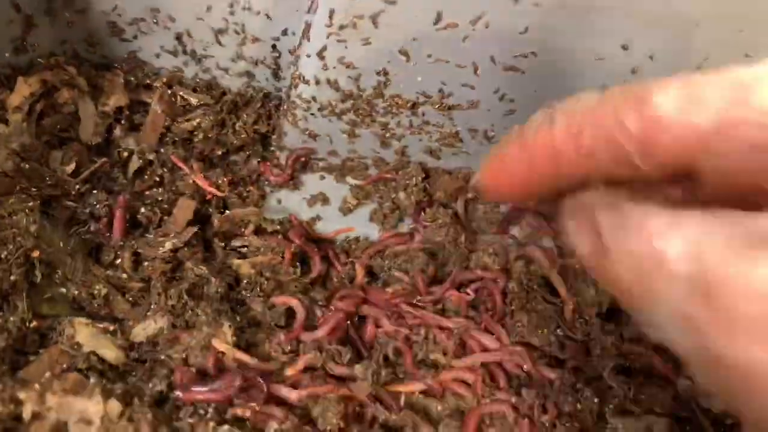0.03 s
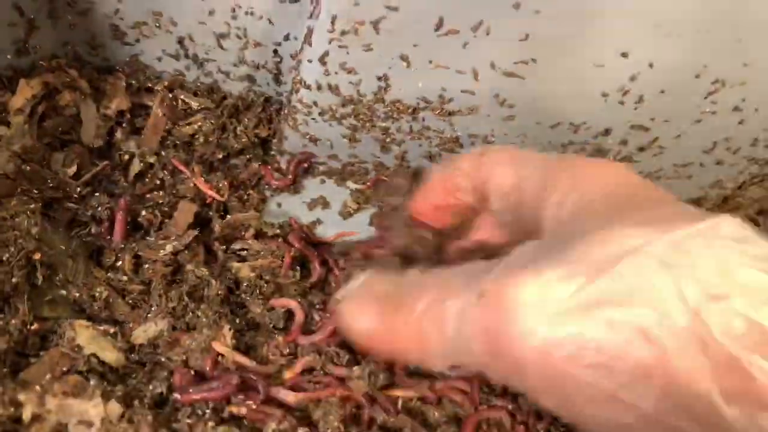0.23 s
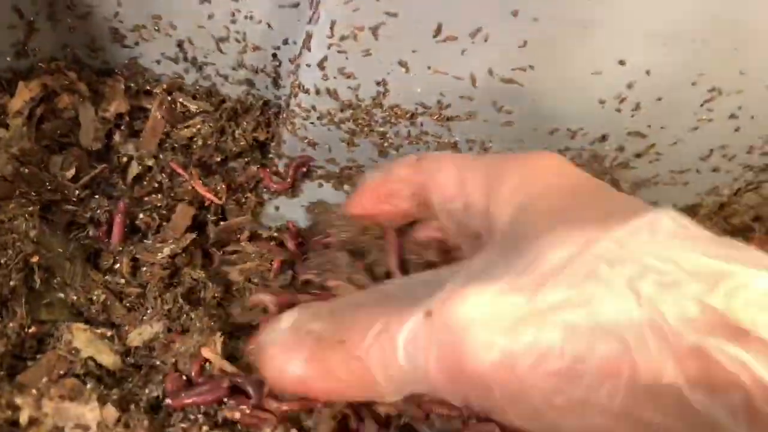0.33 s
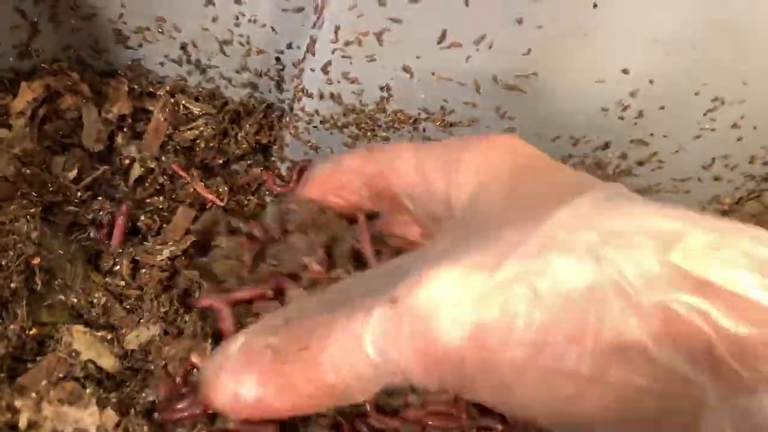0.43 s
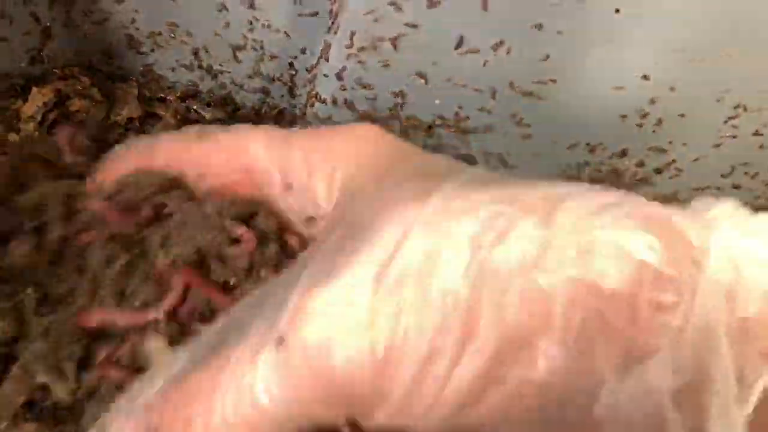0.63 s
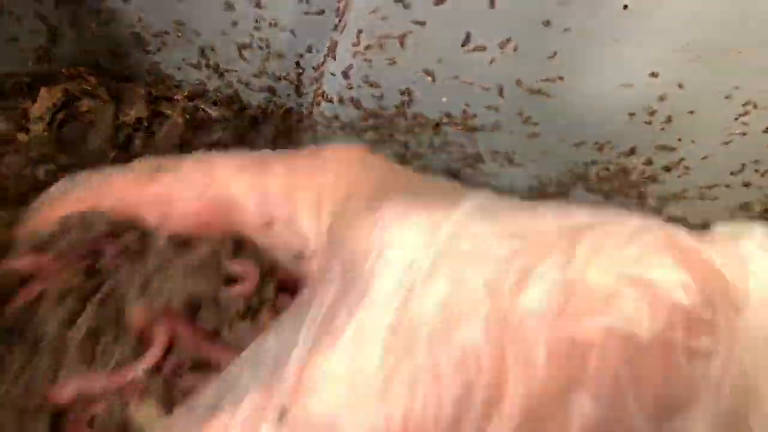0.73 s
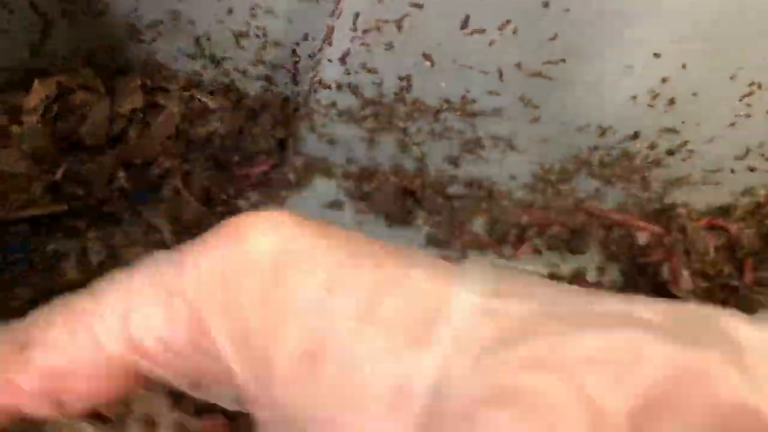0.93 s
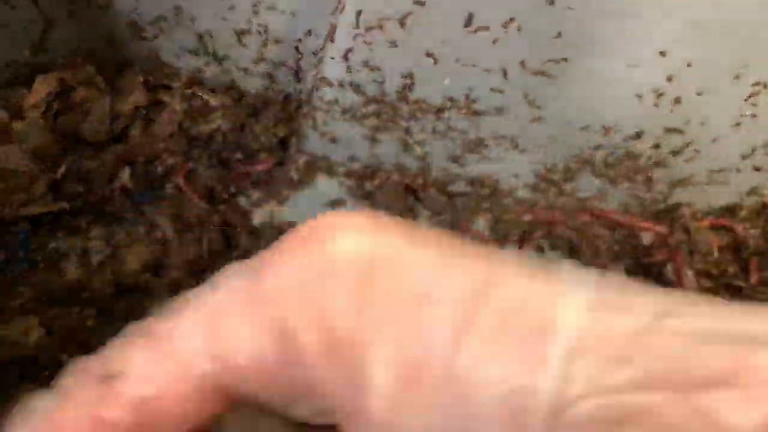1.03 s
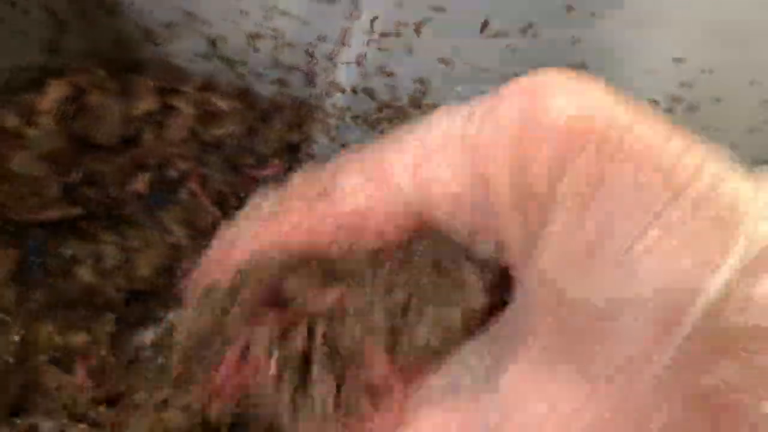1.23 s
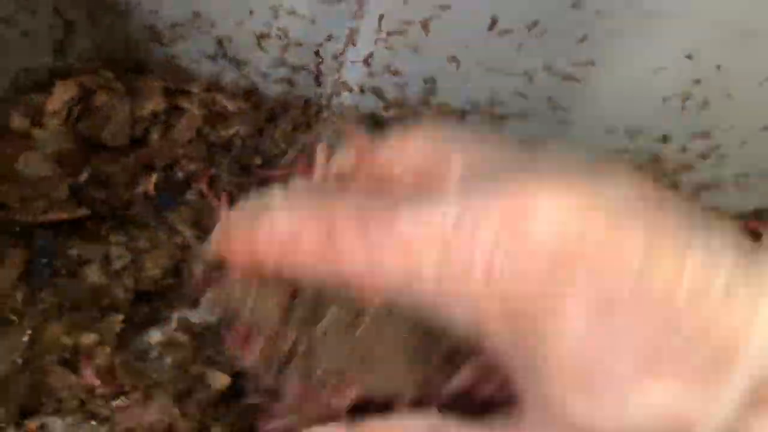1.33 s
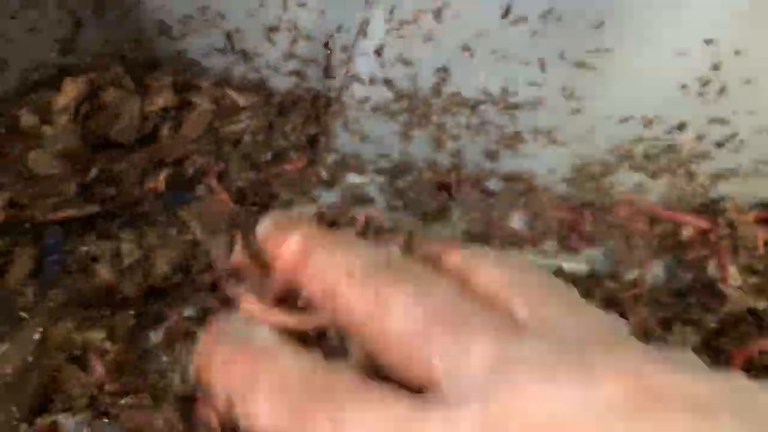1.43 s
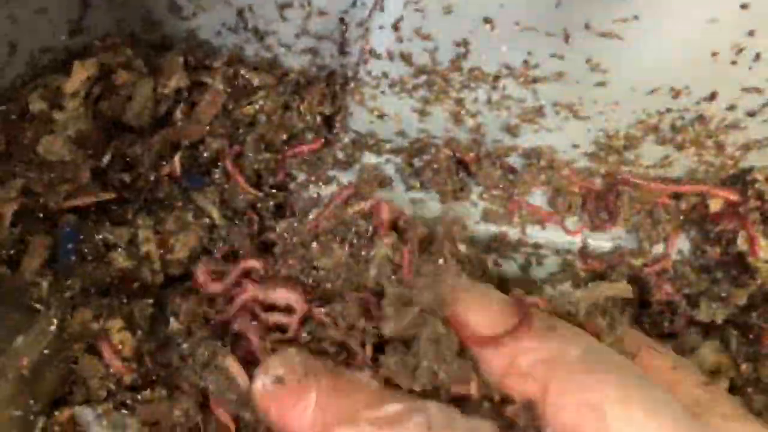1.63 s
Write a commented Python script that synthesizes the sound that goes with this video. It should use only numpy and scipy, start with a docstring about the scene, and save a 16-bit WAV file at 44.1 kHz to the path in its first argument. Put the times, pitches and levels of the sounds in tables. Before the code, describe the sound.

Damp bedding rustles and crackles as fingers scoop it, bumping a plastic bin close by.

```python
"""Faint wet ticks come first, then a knock: a bare hand scoops moist worm bedding in a plastic bin.
Close by, the fingers plough through crackling crumbs, rub the bin floor, then dig a second time.
Knocks and rubbing make the bin ring; wet crumbs snap in between, and a bubble bursts near the end.
Behind it all, faint low tones swell and fade over a quiet room rumble and hiss."""
import sys
import numpy as np
from scipy import signal
from scipy.fft import rfft, irfft
from scipy.io import wavfile

SR = 44100
rng = np.random.default_rng(int(sys.argv[2]) if len(sys.argv) > 2 else 0)


def master_out(mix):
    """Clip the mix to full scale and print it as 16-bit PCM to the path in sys.argv[1]."""
    frames = np.transpose(np.atleast_2d(mix))
    ceiling = np.clip(frames, -1, 1)
    pcm = np.round(ceiling * 32767).astype(np.int16)
    wavfile.write(sys.argv[1], SR, pcm)


N = 74970

# tone of the room's rumble and of its hiss (frequency [Hz], gain [dB])
RUMBLE_COLOUR = [(15, 7), (25, -18), (65, 5), (130, 0.5), (184, -2.5), (226, -7.5), (267, -6), (334, -16.5),
                 (501, -15), (700, -27.5), (910, -114), (1540, -120)]
HISS_COLOUR = [(300, -18), (700, -39), (1500, 3.5), (3000, 4.5), (4800, 6), (5700, 11), (6800, 4),
               (9500, 3), (14000, -43)]
# how the rumble rises and falls (time [s], gain [dB])
RUMBLE_SWELL = [(0, -7.5), (.17, -4.5), (.27, 3.5), (.45, -4), (.7, 3), (1.15, -0.5), (1.4, -2.5),
                (1.7, -3.5)]
# low tones (pitch [Hz], start [s], loudest moment [s], end [s], peak level [dB])
LOW_TONES = [(73, 0.71, 0.9, 1.015, -42), (255, 1.004, 1.111, 1.216, -51), (252, 0.595, 0.61, 1.3, -59)]
# ringing of the bursting bubble (pitch [Hz], level [dB], time to fade by 60 dB [s])
BUBBLE_RING = [(1990, -47, 0.025), (3070, -41, 0.018), (4680, -41.5, 0.014), (5170, -36.5, .012),
               (5750, -43, 0.019), (7130, -48, 0.04)]
# wet crumbs snapping (time [s], peak level [dB], centre [Hz], width [Hz], fade time [s])
WET_TICKS = [(0.033, -54.5, 670, 690, 0.0019), (0.0439, -44.5, 5950, 12000, 0.0019),
             (0.0426, -55, 4830, 1300, 0.0021), (0.131, -52, 8500, 4000, 0.0013),
             (0.198, -29.5, 1020, 835, 0.0052), (0.198, -38, 9100, 18000, 0.0016),
             (0.221, -39.5, 1160, 595, 0.0028), (0.219, -40.5, 9000, 12100, 0.007),
             (0.621, -36, 740, 600, 0.0021), (0.653, -46, 920, 800, 0.0031),
             (0.662, -43, 6000, 9000, 0.0046), (0.833, -49, 8200, 2500, 0.007),
             (1.0105, -42, 5500, 12100, 0.0057), (1.012, -54, 645, 600, 0.0018),
             (1.011, -51, 3200, 1400, 0.0023), (1.025, -53.5, 3400, 800, 0.0036),
             (1.206, -54, 1800, 450, 0.0026), (1.309, -39.5, 10900, 14000, 0.00068),
             (1.338, -45.5, 6100, 5000, 0.0017), (1.364, -43.5, 970, 710, 0.0016),
             (1.387, -48, 4100, 1800, 0.0028), (1.401, -49, 1110, 450, 0.0017),
             (1.46, -41.5, 8400, 7000, 0.002), (1.47, -48.5, 1050, 714, 0.0026),
             (1.504, -46, 2540, 900, 0.0022), (1.613, -37.5, 11500, 13800, 0.00094)]
# ringing of the filled bin (pitch [Hz], relative level [dB], time to fade by 60 dB [s])
BIN_RING = [(67, -54, 0.037), (157.6, 6, 0.084), (366, -3.5, 0.16), (394, 4, 0.042), (471.6, -0.5, 0.059),
            (577, -7, 0.024), (734, -7.5, 0.046), (930, -12, 0.043), (1057, -12.5, 0.076),
            (1210, -12.5, 0.13), (1680, -5.5, 0.023)]
# fingers knocking the bin (time [s], peak level [dB], softness of the touch [ms])
KNOCKS = [(0.0324, -53, 0.66), (0.137, -51.5, 0.61), (0.1995, -28, 0.44), (0.204, -21.5, 0.54),
          (0.209, -29.5, 2.6), (0.218, -30, 7.5), (0.2277, -34.5, 0.13), (0.373, -46, 3.7),
          (0.584, -41, 0.66), (.615, -39.5, 1.4), (.638, -37, 2.7), (0.6207, -31.5, 0.41),
          (0.669, -45.5, 5.9), (.943, -36.5, 1.13), (0.955, -40.5, 0.93), (1.275, -48.5, 0.29),
          (1.339, -42.5, 6.3), (1.41, -37, 3.9), (1.422, -35, 2.4), (1.478, -41.5, 0.68)]
# fingers rubbing the bin floor (start [s], rise [s], fall [s], level [dB], softness of the touch [ms])
RUBS = [(0.45, 0.035, 0.043, -58, 4), (0.575, 0.064, 0.068, -39.5, 0.35), (0.911, 0.015, 0.07, -56, 1),
        (1.343, 0.084, 0.042, -60, 1.2)]
# tone of the rubbing (frequency [Hz], gain [dB])
RUB_COLOUR = [(60, -17), (150, 13), (250, 2), (400, 4), (600, 13), (800, 8.5), (1100, -3), (2000, -2.5)]
# tone of the crackle (frequency [Hz], gain [dB])
CRACKLE_COLOUR = [(120, -33), (220, -8), (400, -5.5), (700, -1.5), (1100, -1), (1500, -7), (2500, -6),
                  (3500, -7), (4800, -8), (6400, -3), (7300, -7.5), (8400, -5), (10000, -5.5),
                  (11500, -29.5), (12400, -6), (13500, -7), (15000, -17)]
# how hard the hand stirs the crumbs (time [s], gain [dB])
STIRRING = [(0, -74.5), (.14, -75), (.188, -62.5), (.204, -53), (.225, -50.5), (.25, -57), (.335, -53),
            (.385, -54.5), (.47, -57), (.53, -54.5), (.6, -55), (.665, -52.5), (.705, -61.5), (.77, -68),
            (.83, -63), (.96, -68), (1.06, -68.5), (1.15, -79), (1.3, -77), (1.34, -59), (1.41, -62.5),
            (1.46, -57.5), (1.51, -66), (1.6, -66), (1.7, -69.5)]
# how much louder the digging is on the left (frequency [Hz], left minus right [dB])
LEFT_LEAN = [(100, 0.5), (280, 1.5), (500, 1), (1000, 4.5), (2000, 4.5), (4500, 0)]

HAND_LAG_MS, BIN_LAG_MS = 0.2212, 0.12  # both sounds reach the right side first
CRUMBS_PER_S, CRUMB_DB = 6500, 4.5
CLUMPS_PER_S, CLUMP_DB = 150, 1  # crumbs give way in clumps, so their level flickers
SIZZLE_DB, GRIT_DB = -9, -13  # relative to the direct crackle and to the rub

TIME = np.arange(N) / SR  # seconds at each sample
FREQS = np.maximum(np.arange(N // 2 + 1) * SR / N, 1)  # Hz at each point of a spectrum


def undb(db):
    """Turn decibels into a gain to multiply by."""
    return 10 ** (np.asarray(db) / 20)


def unit(x):
    """Scale a sound to an average (rms) level of 1."""
    return x / np.sqrt(np.mean(x ** 2) + 1e-20)


def curve(rows):
    """Gain over time from (time [s], gain [dB]) points."""
    return undb(np.interp(TIME, *np.array(rows).T))


def across(rows):
    """Join (frequency [Hz], value) points into a line over the whole spectrum."""
    hz, value = np.array(rows).T
    return np.interp(np.log(FREQS), np.log(hz), value)


def filtered(x, gain):
    """Give each frequency of a sound its own gain."""
    return irfft(rfft(x) * gain, N)


def colour(x, rows):
    """Shape the tone with (frequency [Hz], gain [dB]) points."""
    return filtered(x, undb(across(rows)))


def resonate(x, hz, width_hz):
    """Keep a band around one frequency and weaken the rest."""
    return filtered(x, 1 / (1 + 1j * (FREQS / hz - hz / FREQS) * hz / width_hz) ** 2)


def soften(x, softness_ms):
    """A fleshy fingertip spreads its push over time, which dulls the treble."""
    return filtered(x, 1 / (1 + 2j * FREQS * softness_ms / 1000) ** 2)


def stereo(x, lag_ms):
    """The same sound on both sides, a little later on the left."""
    return np.array([filtered(x, np.exp(-2j * np.pi * FREQS * lag_ms / 1000)), x])


def since(start):
    """Seconds since a moment, zero before it."""
    return np.maximum(TIME - start, 0)


def wander(per_s):
    """Glide between random values, mostly between -1 and 1."""
    return np.interp(TIME * per_s, np.arange(1000), rng.standard_normal(1000))


def clicks(per_s, spread_db):
    """Random clicks, most small and a few large."""
    happens = rng.random(N) < per_s / SR
    size = undb(spread_db * np.minimum(rng.exponential(size=N), 6))
    return happens * size * rng.choice([-1, 1], N)


def ring(tones, start=0, fade_scale=1):
    """A struck object rings with several pure tones that die away."""
    t = since(start)
    return sum(undb(db) * np.sin(2 * np.pi * hz * t) * undb(-60 * t / (fade_s * fade_scale))
               for hz, db, fade_s in tones)


def room(rumble_db=-52, hiss_db=-68.5):
    """A rumble, nearly alike in both ears, and a wide, faint hiss."""
    rumble = colour(rng.standard_normal(N) + 0.21 * rng.standard_normal((2, N)), RUMBLE_COLOUR)
    rumble = filtered(rumble, 1 / (1 + (FREQS / 600) ** 4))  # fades out above 600 Hz
    hiss = colour(0.42 * rng.standard_normal(N) + rng.standard_normal((2, N)), HISS_COLOUR)
    return unit(rumble) * undb(rumble_db) * curve(RUMBLE_SWELL) + unit(hiss) * undb(hiss_db)


def low_tones():
    """Soft low tones swell, waver a little in pitch and fade."""
    out = np.zeros(N)
    for hz, start, top, end, db in LOW_TONES:
        pitch = hz * (1 + 0.008 * wander(per_s=20))
        swell = np.interp(TIME, [start, top, end], [0, 1, 0])
        out += undb(db) * swell * np.sin(2 * np.pi * np.cumsum(pitch) / SR)
    return out


def bubble(start=1.6661, rise_s=0.0008):
    """One small bubble bursts and rings briefly."""
    return ring(BUBBLE_RING, start) * (1 - np.exp(-since(start) / rise_s))


def wet_ticks():
    """Wet crumbs snap one by one, each a tiny burst of noise."""
    out = np.zeros(N)
    for start, db, hz, width_hz, fade_s in WET_TICKS:
        t = since(start)
        burst = rng.standard_normal(N) * (t > 0) * np.exp(-t / fade_s)
        tick = resonate(burst, hz, width_hz)
        out += undb(db) * tick / np.abs(tick).max()
    return out


def finger_knocks(bass_cut_hz=30):
    """Each knock sets the plastic bin ringing; a softer touch sounds duller."""
    out = np.zeros(N)
    for start, db, softness_ms in KNOCKS:
        knock = soften(ring(BIN_RING, start), softness_ms)
        knock = filtered(knock, 1 / (1 + bass_cut_hz / (1j * FREQS)))  # the bin gives off little deep bass
        out += undb(db) * knock / np.abs(knock).max()
    return out


def finger_rubs():
    """Fingers stick and slip on the bin floor, making it ring and dragging grit along."""
    out = np.zeros(N)
    damped_bin = ring(BIN_RING, fade_scale=0.58)
    for start, rise, fall, db, softness_ms in RUBS:
        slips = np.diff(clicks(per_s=1300, spread_db=1.5), prepend=0)
        ringing = signal.fftconvolve(slips, damped_bin)[:N]
        rub = unit(colour(soften(ringing, softness_ms), RUB_COLOUR))
        grit = unit(resonate(clicks(CRUMBS_PER_S, spread_db=1.5), hz=3230, width_hz=2400))
        stroke = np.interp(TIME, [start, start + rise, start + rise + fall], [0, 1, 0])
        out += undb(db) * (rub + undb(GRIT_DB) * grit) * stroke
    return out


def wall_echoes(x, count=32, fade_s=0.0037, changes_per_s=17, gain_db=3):
    """Quick echoes off the bin walls differ left and right, and change as the hand moves."""
    echoes = rng.standard_normal((count, 2, SR // 50)) * np.exp(-TIME[:SR // 50] / fade_s)
    echoes /= np.sqrt(np.sum(echoes ** 2, axis=-1, keepdims=True))
    hand_place = np.minimum(TIME * changes_per_s, count - 1)
    out = np.zeros((2, N))
    for place, echo in enumerate(echoes):
        blend = np.sqrt(np.maximum(1 - np.abs(hand_place - place), 0))
        out += blend * signal.oaconvolve(x[None], echo, axes=1)[:, :N]
    return undb(gain_db) * out


def crumbs():
    """Stirred crumbs make a dense crackle; films of water snap between them and add a sizzle."""
    near, far = (unit(clicks(CRUMBS_PER_S, spread_db=3)) for _ in range(2))
    crackle = stereo(near, HAND_LAG_MS) + wall_echoes(0.82 * near + far)
    sizzle = unit(resonate(clicks(per_s=1100, spread_db=1.7), hz=11600, width_hz=7300))
    crackle += undb(SIZZLE_DB) * stereo(sizzle, HAND_LAG_MS)
    loudness = curve(STIRRING) * undb(CRUMB_DB + CLUMP_DB * wander(CLUMPS_PER_S))
    return unit(colour(crackle, CRACKLE_COLOUR)) * loudness


def scene():
    """The digging, a little louder on the left, over the low tones and the room."""
    digging = crumbs()
    digging += stereo(finger_knocks() + finger_rubs(), BIN_LAG_MS)
    digging += stereo(wet_ticks() + bubble(), HAND_LAG_MS)
    lean_db = across(LEFT_LEAN)
    return filtered(digging, undb([lean_db / 2, -lean_db / 2])) + low_tones() + room()


def record(dry):
    """Cut away the highest treble, above 15500 Hz."""
    return signal.sosfilt(signal.ellip(8, .2, 70, 15500, fs=SR, output="sos"), dry)


dry = scene()
out = record(dry)
master_out(out)
```